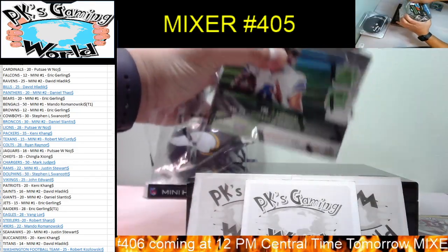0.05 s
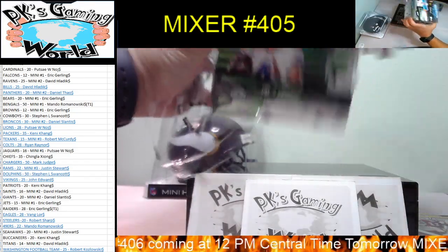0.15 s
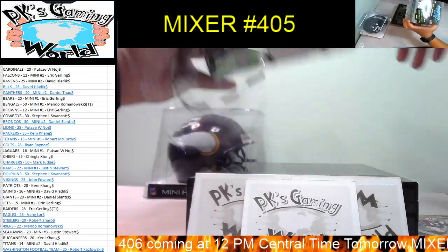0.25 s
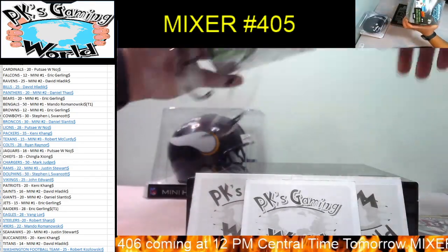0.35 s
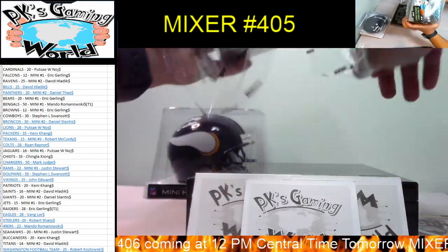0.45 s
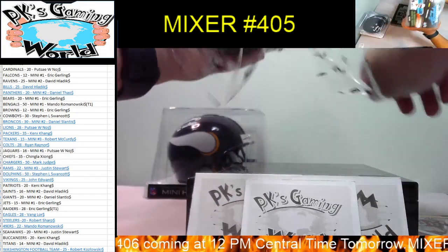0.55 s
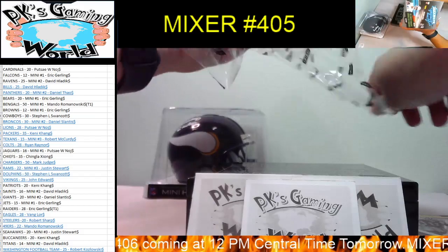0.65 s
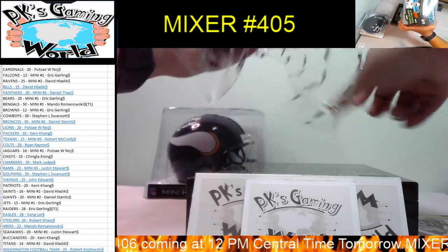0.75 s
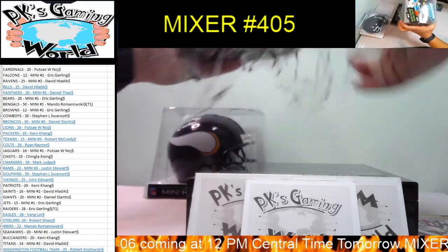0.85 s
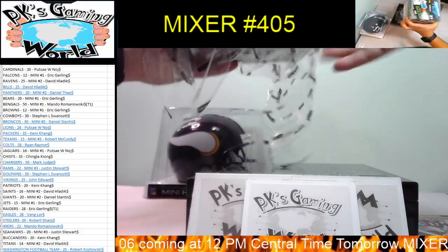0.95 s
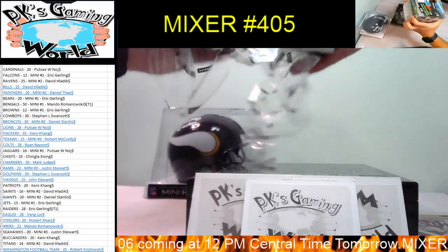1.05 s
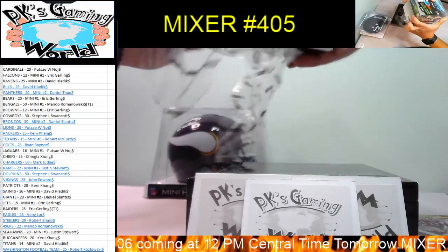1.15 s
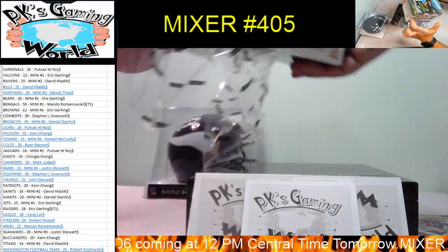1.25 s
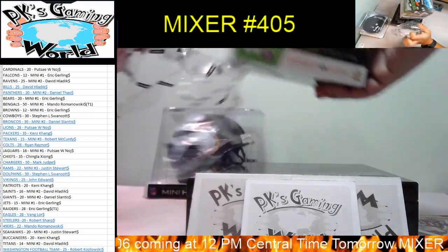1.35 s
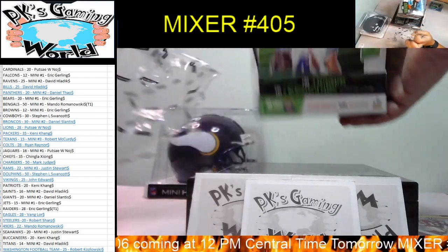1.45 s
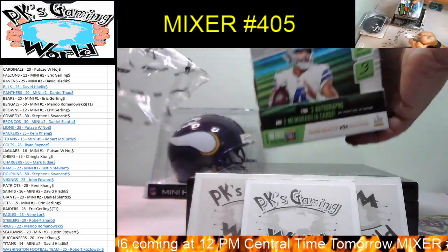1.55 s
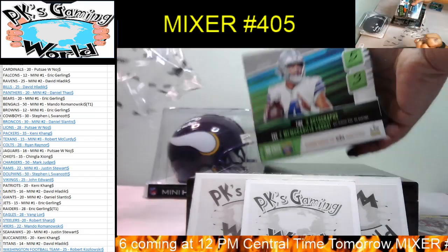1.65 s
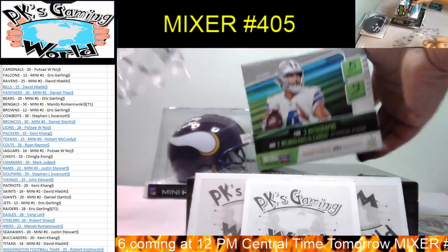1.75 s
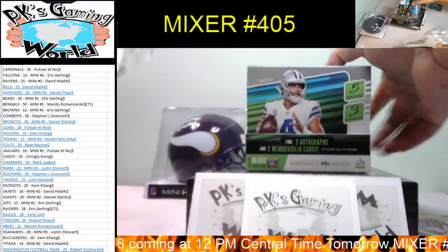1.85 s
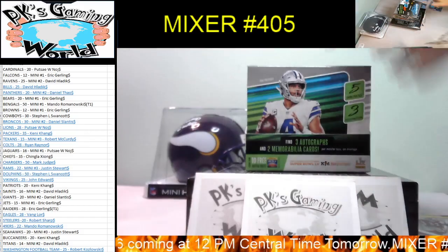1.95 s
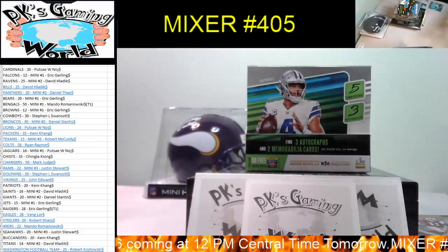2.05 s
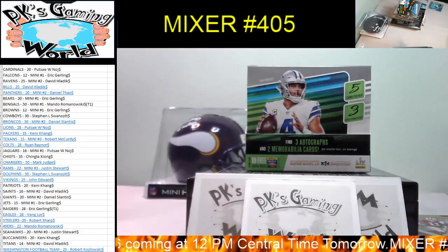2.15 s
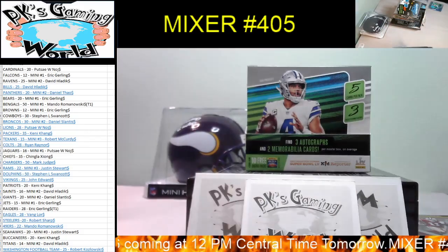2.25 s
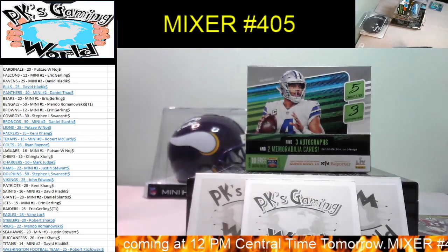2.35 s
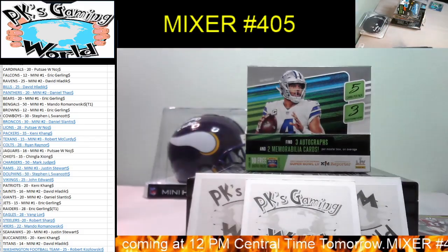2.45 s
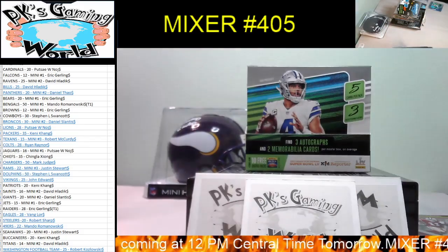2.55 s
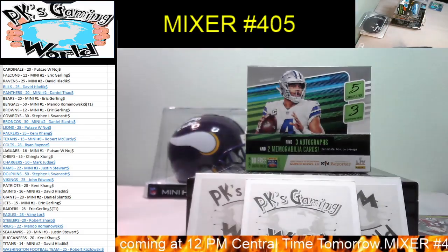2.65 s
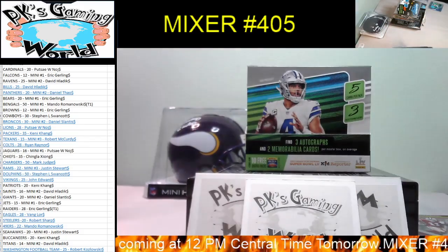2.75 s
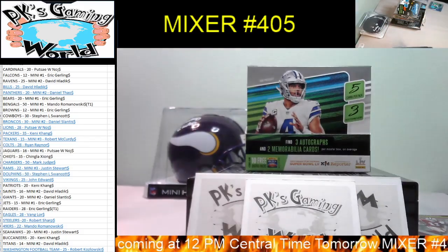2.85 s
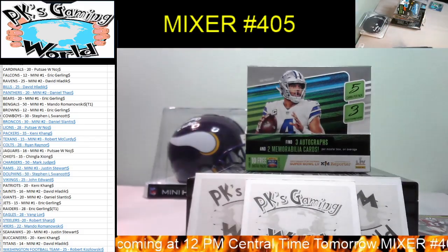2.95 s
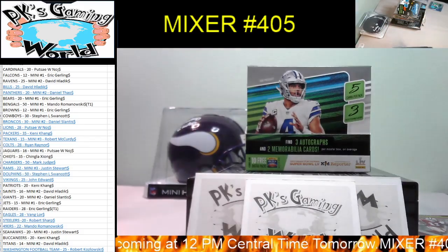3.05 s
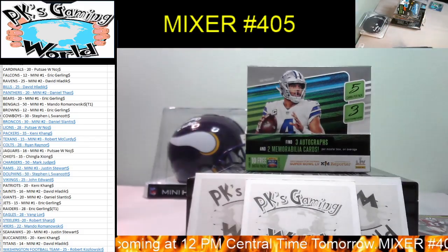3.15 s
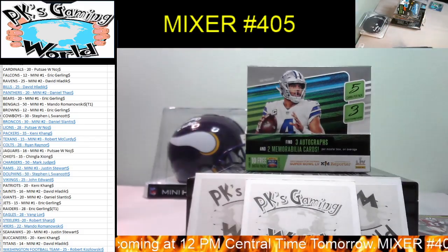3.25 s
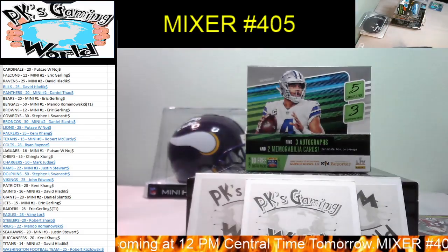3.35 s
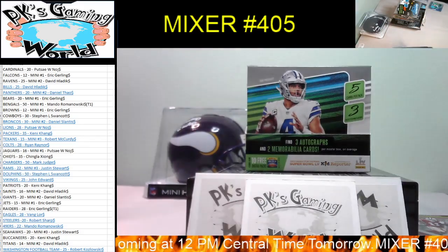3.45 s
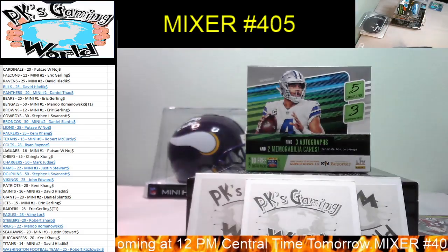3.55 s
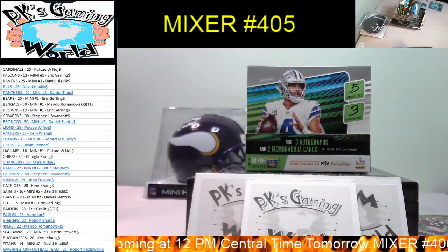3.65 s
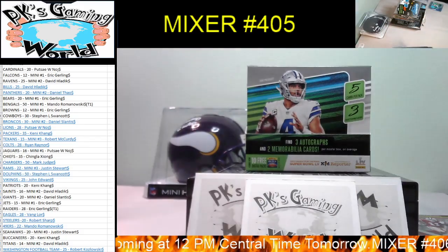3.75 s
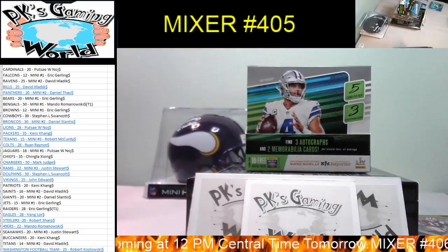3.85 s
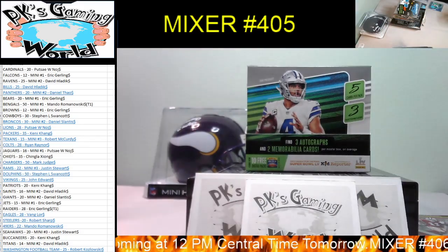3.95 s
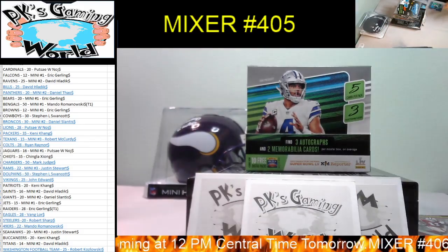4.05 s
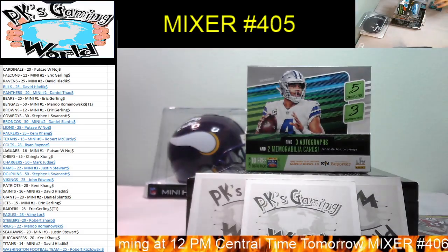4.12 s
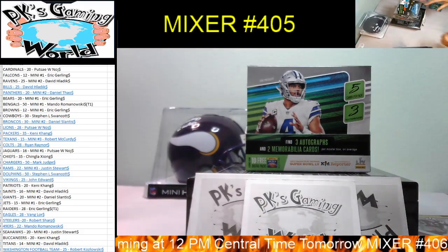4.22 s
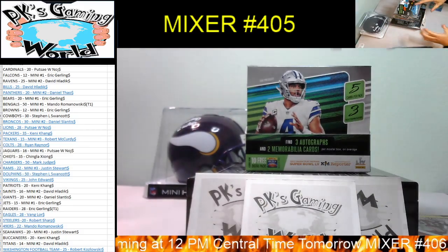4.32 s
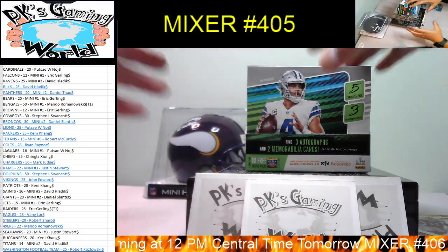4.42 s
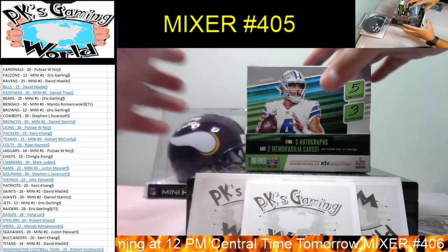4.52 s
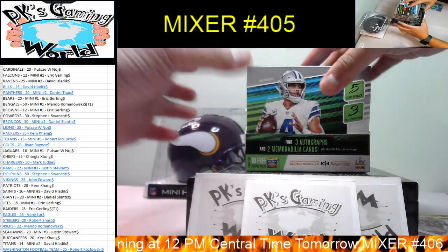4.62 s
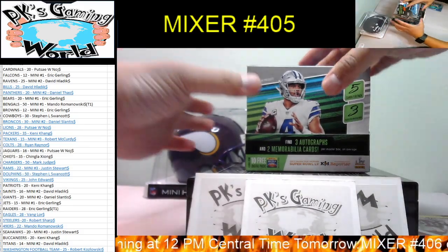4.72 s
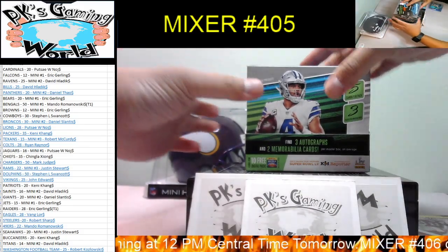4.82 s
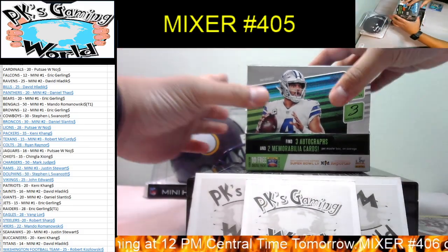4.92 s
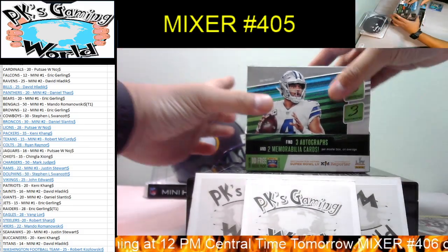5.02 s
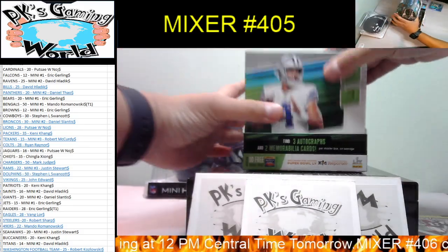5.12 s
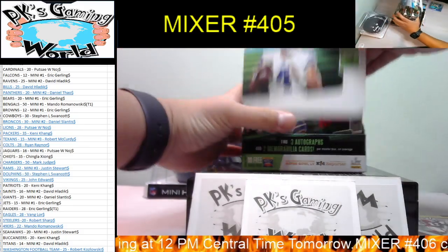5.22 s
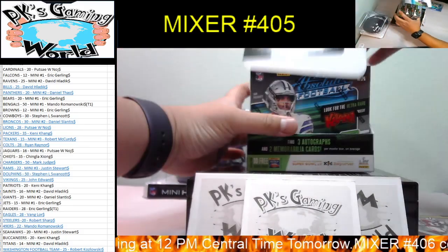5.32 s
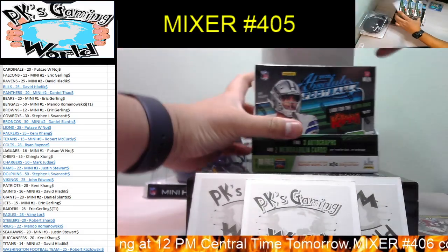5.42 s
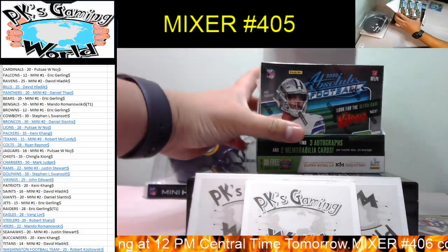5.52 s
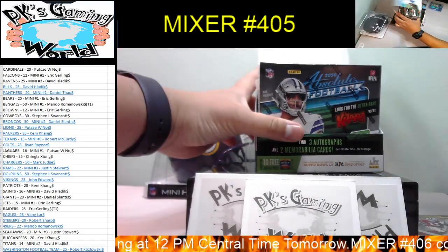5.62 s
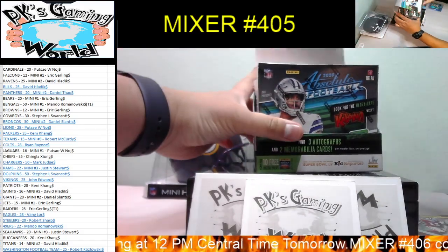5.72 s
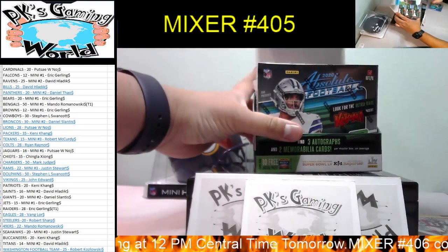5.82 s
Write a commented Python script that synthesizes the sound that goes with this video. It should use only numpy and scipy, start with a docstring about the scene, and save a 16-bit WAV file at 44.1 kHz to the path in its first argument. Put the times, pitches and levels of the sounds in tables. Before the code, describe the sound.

From the start, plastic film crackles close by as it is pulled off a small cardboard box, with the sharpest snap at about 0.2 seconds and more snaps and a hollow knock around 0.5. Lighter crinkles and taps continue until about 1.5 seconds. The box bumps the desk on its edge at 1.65 seconds, then lands flat with a heavier thud at 1.8, leaving a low, fading hum. The film is crumpled again from 2 to 2.6 seconds and thins into small crackles, ending by 3.5. Around 3 seconds something creaks further off in three quick ticks. After a near-silent lull, fingers softly slide and tap on cardboard from about 4.4 seconds. The scrapes and knocks grow firmer from 5.3 to 5.8 as the lid comes off, with a faint low desk rumble. The room is small and quiet, with a faint steady hush.

```python
"""Unwrapping a small box

Hands pull plastic film off a cardboard box, set the box on a desk, crumple and discard the film, then
lift the lid. Film crackles and snaps at its creases; cardboard scrapes and knocks. The desk hums under
leaning arms and rings as the box lands. Something creaks further off in the small, quiet room."""
import sys
import numpy as np
from scipy import signal
from scipy.io import wavfile
from scipy.ndimage import uniform_filter1d

SR = 44100
rng = np.random.default_rng(int(sys.argv[2]) if len(sys.argv) > 2 else 0)


def file_out(sig):
    """Save sig as 16-bit WAV at sys.argv[1]."""
    # one column per channel
    cols = np.atleast_2d(sig).T
    # limit, then scale
    lim = np.clip(cols, -1, 1)
    pcm = np.round(lim * 32767).astype(np.int16)
    wavfile.write(sys.argv[1], SR, pcm)


N = 259075

# Pulls and squeezes of the wrap. Each row: start and length in seconds, film and cardboard levels in dB.
WRAP_TUGS = [(0.0, 0.0067, -35, -46.5), (0.082, 0.05, -34, -37.5), (0.16, 0.029, -30.5, -35),
             (0.343, 0.11, -50, -53), (0.474, 0.11, -36, -37.5), (0.673, 0.18, -45, -49),
             (0.926, 0.081, -57, -61), (0.957, 0.16, -50.5, -54), (1.113, 0.15, -44, -52),
             (1.283, 0.082, -53, -59), (1.465, 0.07, -63.5, -74), (1.567, 0.046, -54, -69),
             (1.668, 0.12, -55.5, -57), (1.76, 0.032, -52, -49), (2.017, 0.033, -56.5, -64.5),
             (2.074, 0.17, -37.5, -48), (2.285, 0.066, -37, -48), (2.344, 0.26, -37, -52.5),
             (2.622, 0.31, -52.5, -68), (2.985, 0.032, -43, -53), (3.058, 0.037, -42.5, -50),
             (3.212, 0.11, -52.5, -57), (3.404, 0.16, -67, -83)]
# Fingers on box and lid. Each row: start and length in seconds, level in dB, treble offset in dB.
FINGER_SLIDES = [(3.79, 0.16, -68.5, -9), (4.053, 0.053, -72.5, 5), (4.391, 0.074, -60.5, -1),
                 (4.68, 0.015, -59.5, -1.5), (4.782, 0.16, -50, -6.5), (4.948, 0.058, -51.5, 1.5),
                 (5.027, 0.042, -50.5, 2.5), (5.127, 0.052, -56.5, 5), (5.333, 0.057, -45, 1),
                 (5.393, 0.061, -43, 3), (5.592, 0.084, -45.5, -3.5), (5.75, 0.036, -52, 7.5)]
# Noise spectra. Each row: frequency in Hz, relative density in dB.
FILM_SPECTRUM = [(410, -34.5), (700, -8.5), (1170, -4.5), (1750, 1.5), (3110, -4), (4550, 1), (5190, -1.5),
                 (14000, -7), (16000, -6.5)]
CARDBOARD_SPECTRUM = [(76, -31), (130, -6), (207, -3), (394, -2), (780, -5), (935, -4), (1370, -9),
                      (2180, -10.5), (2510, -14), (8230, -18), (16000, -41.5)]
HUSH_SPECTRUM = [(35, -33), (60, -13), (113, -2.5), (227, -15.5), (294, -15), (651, -22.5), (903, -23.5),
                 (14900, -35), (16000, -36)]
# Arms on the desk. Each row: time in seconds, sway level in dB, hum level in dB.
ARM_LEAN = [(0.0, -58, -67), (1.45, -75, -71.5), (1.63, -77, -69), (1.75, -46, -55), (1.95, -44.5, -49.5),
            (2.2, -53, -47), (3.1, -68, -59.5), (4.38, -74.5, -70.5), (4.53, -58.5, -70), (4.9, -61, -61),
            (5.13, -46, -67), (5.25, -54, -67), (5.45, -51, -48.5), (5.77, -51, -60), (5.87, -55, -83)]
# Low desk resonances. Each row: frequency in Hz, width in Hz.
SWAY_MODES = [(32, 22), (50, 12)]
HUM_MODES = [(101, 23), (124, 2.7)]
# Single creases. Each row: start in seconds, level in dB, centre in Hz.
CREASE_SNAPS = [(0.105, -16.5, 7100), (0.178, -1.5, 7660), (0.3542, -30, 8940), (0.3963, -28, 9800),
                (0.4768, -29.5, 7900), (0.504, -9, 4350), (0.56, -16.5, 4350), (0.976, -34, 8450),
                (1.1283, -30, 8550), (1.1775, -23, 4600), (1.3163, -22, 5030), (1.4097, -32, 7000),
                (1.5683, -40, 8400), (1.807, -19, 2780), (1.8955, -33, 8300), (2.0507, -34.5, 4750),
                (2.105, -27.5, 2380), (2.445, -22.5, 4320), (2.8083, -32, 6300), (3.26, -33, 7060),
                (4.7668, -48, 4390), (5.35, -37.5, 5200), (5.372, -33.5, 4500), (5.707, -32, 3300),
                (5.7618, -33, 3830)]
# Fingers and flaps on cardboard. Each row: start in seconds, level in dB, panel pitch in Hz.
PANEL_KNOCKS = [(0.467, -33, 740), (0.558, -16.5, 320), (1.03, -35.5, 830), (1.045, -37.5, 204),
                (1.2, -26.5, 774), (4.068, -51, 867), (4.417, -46.5, 590), (4.551, -43, 291),
                (4.697, -45, 574), (4.819, -44, 554), (4.847, -38, 1520), (4.867, -32.5, 1510),
                (5.374, -33, 251), (5.423, -26, 870), (5.452, -26, 204), (5.672, -31.5, 1080),
                (5.708, -23.5, 1030), (5.764, -28, 1100)]
# The box lands on an edge, then flat. Each row: start in seconds, level in dB.
BOX_LANDINGS = [(1.651, -24.5), (1.807, -13)]
# Struck desk. Each row: frequency in Hz, relative level in dB, T60 in seconds.
DESK_MODES = [(32.03, -15.5, 1.26), (102.6, -3.5, 0.55), (121.2, -11, 0.74), (224, 7, 0.063),
              (348, -2.5, 0.086), (514, 8, 0.029), (582, -4, 0.058), (1230, 8, 0.0095)]
# Slips of the creak. Each row: start in seconds, relative level in dB.
CREAK_SLIPS = [(2.935, -27.5), (2.997, -24.5), (3.071, -24.5)]
# Creaking body. Each row: frequency in Hz, width in Hz, gain in dB.
CREAK_MODES = [(282, 180, 4), (603, 380, 10.5), (938, 94, 14.5), (1310, 460, 8.5), (2010, 310, 11),
               (2700, 540, 0), (3500, 830, -11)]
# Room decay. Each row: frequency in Hz, T60 in seconds.
ROOM_T60 = [(150, 0.35), (660, 0.24), (1740, 0.33), (4600, 0.35), (12000, 0.3)]


def gain_of(db):
    return 10 ** (np.asarray(db) / 20)


def unit_rms(x):
    return x / np.sqrt(np.mean(x ** 2) + 1e-20)


def at_hz(table, hz):
    table_hz, values = np.transpose(table)
    return np.interp(np.log(hz + 1), np.log(table_hz + 1), values)


def add(mix, start_s, sound):
    part = mix[round(start_s * SR):][:len(sound)]
    part += sound[:len(part)]


def coloured(x, spectrum):
    """Minimum-phase filter: clicks keep a sharp front."""
    hz = abs(np.fft.fftfreq(8192, 1 / SR))
    log_gain = np.log(gain_of(at_hz(spectrum, hz)))
    phase = -signal.hilbert(log_gain).imag
    taps = np.fft.ifft(np.exp(log_gain + 1j * phase)).real[:4096]
    return signal.oaconvolve(x, taps)[:len(x)]


def resonate(x, hz, width_hz, stages=1):
    """Resonance with about unit gain at its centre."""
    pole = np.exp((2j * hz - width_hz) * np.pi / SR)
    for _ in range(stages):
        x = 2 * signal.lfilter([1 - abs(pole)], [1, -pole], x).real
    return x


def crackle(slips_per_s, spread_db, clump_db, bed):
    """Clumped slips of unequal size over a bed of fine noise."""
    clumps = unit_rms(uniform_filter1d(uniform_filter1d(rng.standard_normal(N), 500), 500))
    slipping = rng.random(N) < slips_per_s / SR
    size_db = spread_db * np.minimum(rng.exponential(1, N), 5)
    slips = rng.choice([-1., 1.], N) * gain_of(size_db) * slipping
    grains = unit_rms(slips) + bed * rng.standard_normal(N)
    return unit_rms(grains * gain_of(clump_db * clumps))


def strokes(table, levels_db, rise_share=0.29, settle_db_per_s=208.5):
    """Envelope: each stroke swells, holds and settles; powers add."""
    t = np.arange(N) / SR
    power = np.zeros(N)
    for (start_s, length_s, *_), db in zip(table, levels_db):
        swell = np.clip((t - start_s) / (rise_share * length_s), 0, 1) ** 2
        fall_db = settle_db_per_s * np.maximum(t - start_s - length_s, 0)
        power += (swell * gain_of(db - fall_db)) ** 2
    return np.sqrt(power)


def burst(samples, db, hz, decay_ms, q, broad):
    """Noise puff, part broadband, part ringing."""
    age = np.arange(samples) / SR / (decay_ms / 1000)
    push = rng.standard_normal(samples) * (1 - np.exp(-4.5 * age)) * np.exp(-age)
    soft = signal.lfilter(*signal.butter(2, min(2.4 * hz, 0.45 * SR), fs=SR), push)
    sound = broad * soft + resonate(push, hz, hz / q)
    return gain_of(db) * sound / abs(sound).max()


def reflections(x, delay_s):
    """Sparse echoes of random sign; each band decays at its own rate."""
    taps = np.zeros(SR // 2)
    slots = np.arange(round(delay_s * SR), len(taps) - 12, 12)
    taps[slots + rng.integers(0, 12, len(slots))] = rng.choice([-1., 1.], len(slots))
    hz, t, bands = signal.stft(taps, SR, nperseg=256)
    decay = gain_of(-60 * t / at_hz(ROOM_T60, hz)[:, None])
    tail = signal.istft(bands * decay, SR, nperseg=256)[1]
    return signal.oaconvolve(x, tail / np.linalg.norm(tail))[:N]


def in_room(x, room_db):
    """Direct sound plus reflections, at about the same total power."""
    wet = gain_of(room_db)
    return (x + wet * reflections(x, delay_s=0.0034)) / np.sqrt(1 + wet ** 2)


def film_crinkle():
    """Tugged film crackles densely."""
    slips = crackle(slips_per_s=2300, spread_db=3.5, clump_db=2.0, bed=0.6)
    grains = unit_rms(coloured(slips, FILM_SPECTRUM))
    return in_room(grains * strokes(WRAP_TUGS, [db for _, _, db, _ in WRAP_TUGS]), room_db=-8)


def cardboard_rub():
    """Grainy scrape: dull under the wrap, brighter on the bare box and lid."""
    slips = crackle(slips_per_s=3000, spread_db=3, clump_db=2.5, bed=0.8)
    grains = unit_rms(coloured(slips, CARDBOARD_SPECTRUM))
    low = signal.sosfilt(signal.butter(2, 1500, fs=SR, output="sos"), grains)
    high = grains - low
    under_wrap = low * strokes(WRAP_TUGS, [db for *_, db in WRAP_TUGS])
    lid = low * strokes(FINGER_SLIDES, [db for *_, db, _ in FINGER_SLIDES])
    lid_treble = high * strokes(FINGER_SLIDES, [db + treble_db for *_, db, treble_db in FINGER_SLIDES])
    return in_room(under_wrap + lid + lid_treble, room_db=-10)


def desk_shake():
    """Small pushes from leaning arms drive the desk's low resonances."""
    out, t = np.zeros(N), np.arange(N) / SR
    push = rng.standard_normal(N)
    times_s, sway_db, hum_db = np.transpose(ARM_LEAN)
    for modes, levels_db in ((SWAY_MODES, sway_db), (HUM_MODES, hum_db)):
        rumble = sum(resonate(push, hz, width_hz, stages=2) for hz, width_hz in modes)
        out += unit_rms(rumble) * gain_of(np.interp(t, times_s, levels_db))
    return out * (t <= times_s[-1])


def room_hush(level_db=-66):
    """Steady, bass-heavy background noise."""
    return gain_of(level_db) * unit_rms(coloured(rng.standard_normal(N), HUSH_SPECTRUM))


def crease_snaps():
    """Creases snap, the hardest the shortest; thin film radiates little bass."""
    out = np.zeros(N)
    for start_s, db, hz in CREASE_SNAPS:
        add(out, start_s, burst(1500, db, hz, decay_ms=0.4 - 0.1157 * db, q=2.7, broad=0.36))
    thin = signal.lfilter(*signal.butter(2, 1500, "high", fs=SR), out)
    return thin + gain_of(-5.5) * reflections(thin, delay_s=0.002)


def panel_knocks():
    """Soft blows on cardboard; the walls return little of their bass."""
    out = np.zeros(N)
    for start_s, db, hz in PANEL_KNOCKS:
        add(out, start_s, burst(2500, db, hz, decay_ms=3.47, q=3.9, broad=0.099))
    dull = signal.lfilter(*signal.butter(2, [110, 2500], "band", fs=SR), out)
    to_walls = signal.lfilter(*signal.butter(1, 500, "high", fs=SR), dull)
    return dull + gain_of(-5) * reflections(to_walls, delay_s=0.0036)


def box_thuds(rise_cycles=0.32, tick_decay_s=0.0068):
    """The box rings the desk's modes: a hard tick first, the bass last."""
    out, ring, t = np.zeros(N), np.zeros(SR), np.arange(SR) / SR
    for hz, db, t60_s in DESK_MODES:
        swell = 1 - np.exp(-t * hz / rise_cycles)
        ring += swell * gain_of(db - 60 * t / t60_s) * np.sin(2 * np.pi * hz * t)
    for start_s, db in BOX_LANDINGS:
        tick = signal.lfilter([0.15], [1, -0.85], rng.standard_normal(SR)) * np.exp(-t / tick_decay_s)
        add(out, start_s, gain_of(db) * (ring / abs(ring).max() + 0.5 * tick))
    return in_room(out, room_db=-2.5)


def distant_creak():
    """Slips ring one body, perhaps a chair joint, heard mostly via the walls."""
    slips = np.zeros(N)
    for start_s, db in CREAK_SLIPS:
        slips[round(start_s * SR)] = gain_of(db)
    ring = sum(gain_of(db) * resonate(slips, hz, width_hz, stages=2) for hz, width_hz, db in CREAK_MODES)
    body = 0.0099 * slips + ring
    far_wall = gain_of(1.5) * reflections(body, delay_s=0.011)
    near_walls = gain_of(6) * reflections(body, delay_s=0.001995)
    return gain_of(18.5) * (body + near_walls + far_wall)


def scene():
    mono = room_hush() + film_crinkle() + cardboard_rub() + desk_shake()
    mono += crease_snaps() + panel_knocks() + box_thuds() + distant_creak()
    return np.array([mono, mono])


def record(dry):
    """Steep low-pass."""
    cutoff_hz = 15900
    taps = signal.firwin(401, cutoff_hz, window=("kaiser", 9), fs=SR)
    return signal.oaconvolve(dry, taps[None], "same")


dry = scene()
out = record(dry)
file_out(out)
```